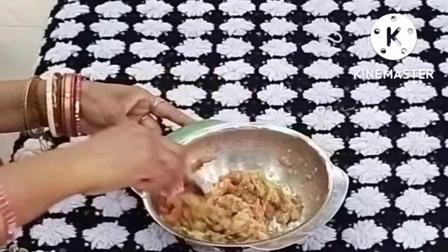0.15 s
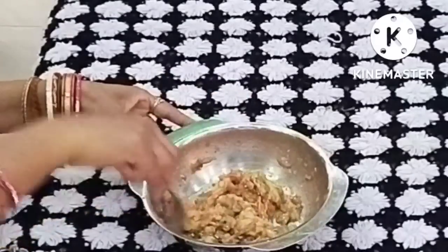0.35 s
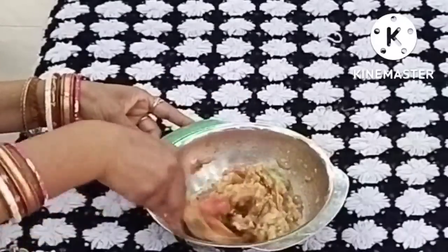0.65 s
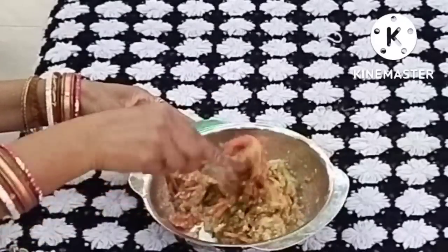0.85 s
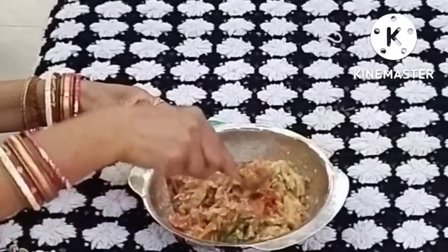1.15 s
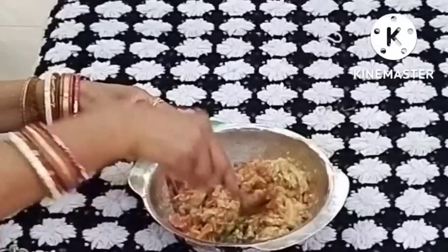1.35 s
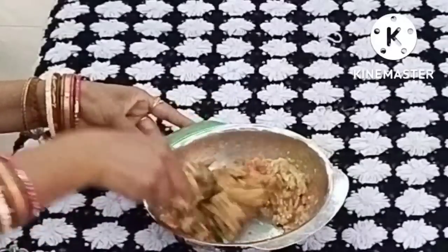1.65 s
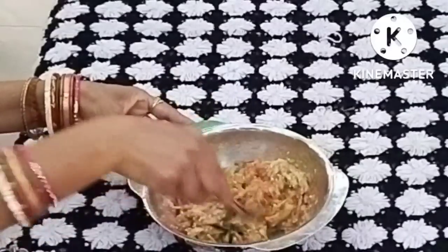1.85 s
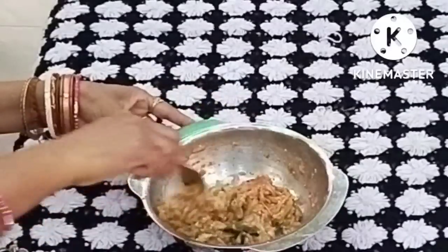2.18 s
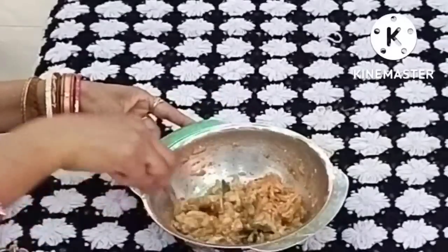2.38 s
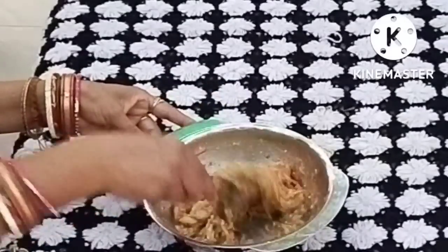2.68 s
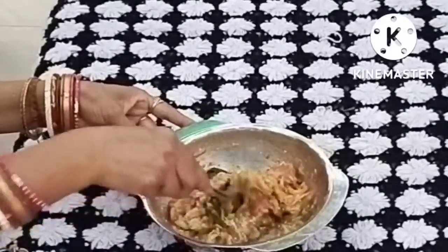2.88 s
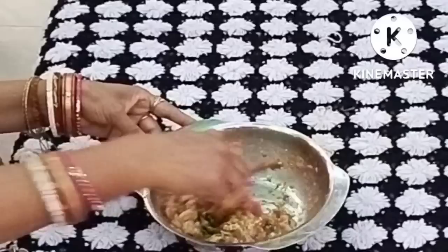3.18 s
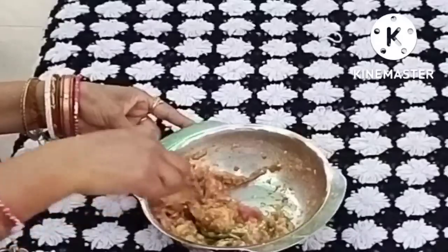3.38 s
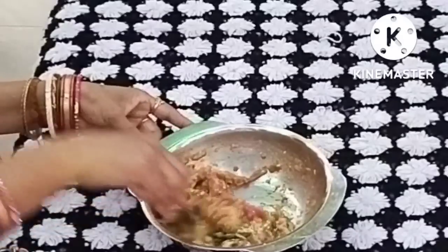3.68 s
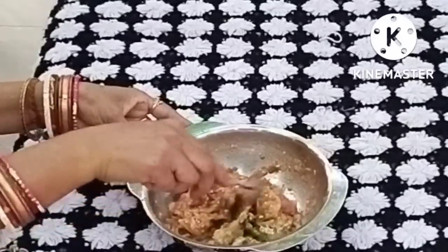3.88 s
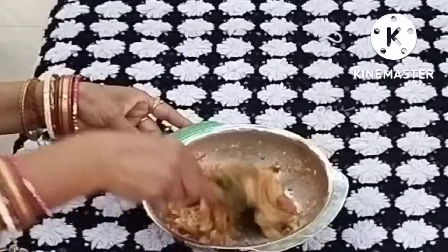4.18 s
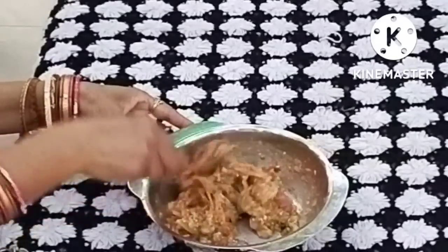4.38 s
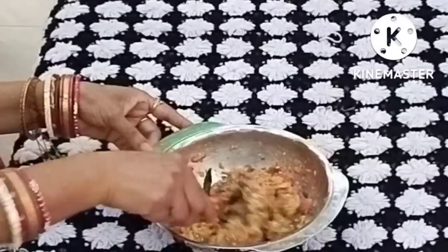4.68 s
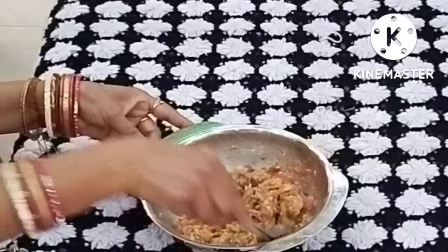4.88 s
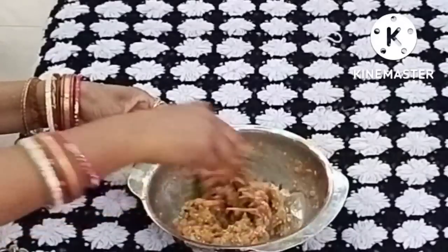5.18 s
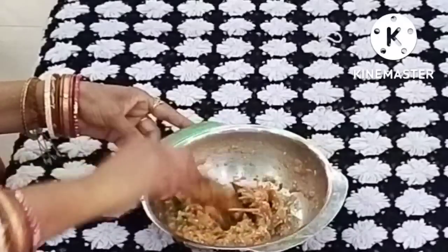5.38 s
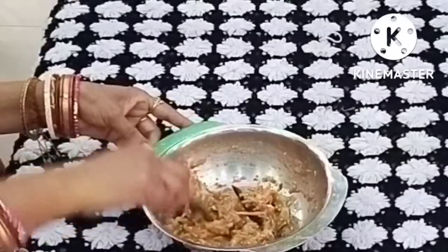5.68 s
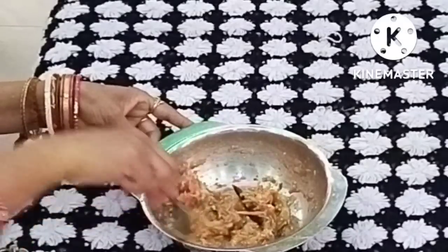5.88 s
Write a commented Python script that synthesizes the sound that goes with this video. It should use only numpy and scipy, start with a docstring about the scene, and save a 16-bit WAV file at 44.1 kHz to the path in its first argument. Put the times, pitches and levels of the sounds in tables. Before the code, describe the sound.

Steel spoon knocks lead, sharp and ringing in the early seconds, with soft crackly mash squish between. After the middle, the bowl bumps the cloth-covered table with a lower, woody-metal knock, a low rumble enters, and thin high bangle clinks grow frequent. One loud, clear bowl ring stands out late. The small hard room adds a short reverberant tail; air noise opens and shuts with each sound.

```python
"""A bare kitchen: a spoon stirs wet vegetable mash in a steel bowl, knocking on its rim and wall.
Blows and wrist bangles are decaying vibration modes under a crack of noise; mash is noise and crackle.
A short squeak falls, the bowl's foot knocks on the table, and air noise and a low rumble lie beneath.
The microphone takes in nearly as much reverberation as direct sound from blows, bangles, mash and squeak.
The recorder's noise gate opens at each small noise and sinks towards silence between."""
import sys
import numpy as np
from scipy import signal
from scipy.fft import rfft, irfft, next_fast_len
from scipy.io import wavfile
from scipy.ndimage import uniform_filter1d

SR = 44100
rng = np.random.default_rng(int(sys.argv[2]) if len(sys.argv) > 2 else 0)


def master(y):
    """Save y as 16-bit WAV."""
    cut = np.clip(np.atleast_2d(y).T, -1, 1)
    pcm = np.round(cut * 32767)  # scale
    wavfile.write(sys.argv[1], SR, pcm.astype(np.int16))


N = 266364


def from_db(db):
    """Decibels to gain."""
    return 10 ** (np.asarray(db) / 20)


def rms_one(x):
    """Scale to unit rms."""
    return x / np.sqrt(np.mean(x ** 2) + 1e-20)


def in_time(rows):
    """Columns of a curve table, read at every sample."""
    s, *columns = np.transpose(rows)
    return [np.interp(np.arange(N) / SR, s, column) for column in columns]


def at_hz(points, hz):
    """Read a spectrum on a log-frequency axis."""
    point_hz, point_db = np.array(points).T
    return np.interp(np.log(hz), np.log(point_hz), point_db)


def colour(x, spectrum):
    """Give a signal a spectrum; rms 1."""
    size = next_fast_len(N)
    hz = np.fft.rfftfreq(size, 1 / SR) + 1   # the offset avoids log of zero
    return rms_one(irfft(rfft(x, size) * from_db(at_hz(spectrum, hz)), size)[:N])


def drift(step_s):
    """Normal random values of spread 1, one every step, joined by lines."""
    count = int(N / SR / step_s) + 2
    return np.interp(np.arange(N) / SR / step_s, np.arange(count), rng.standard_normal(count))


def grains(per_s, spread_db):
    """Random clicks of uneven size and sign."""
    boost_db = spread_db * np.minimum(rng.exponential(1, N), 5)
    sizes = from_db(boost_db) * rng.standard_normal(N)
    return sizes * (rng.random(N) < per_s / SR)


def hold_and_fall(level_db, fall_db_per_s):
    """Follow rises at once, but fall no faster than the given rate."""
    fallen_db = fall_db_per_s * (np.arange(N) / SR)
    return np.maximum.accumulate(level_db + fallen_db) - fallen_db


def blows(rows, modes, crack_db, crack_s):
    """Each blow sets every mode ringing, weighted by where it lands, under a short crack of contact."""
    out = np.zeros(N + SR)
    t = np.arange(SR * 2 // 3) / SR
    hz, width, mode_db = np.transpose(modes)[:, :, None]
    chance = rng.standard_normal((len(rows), 2, len(modes), 1))
    noise = rng.standard_normal((len(rows), len(t)))
    bins = np.fft.rfftfreq(len(t), 1 / SR) + 1
    contact = t / crack_s * np.exp(1 - t / crack_s)
    for row, (uneven, turn), hiss in zip(rows, chance, noise):
        s, peak_db, top_hz, below, above, length, *favoured = row
        octaves = np.log2(hz / top_hz)
        weight_db = mode_db + np.where(octaves < 0, below, -above) * octaves
        if favoured:
            favoured_hz, extra_db = favoured
            weight_db[np.argmin(np.abs(hz - favoured_hz))] += extra_db
        # a wide mode dies fast, so it starts stronger for the same spectral height
        start = from_db(weight_db + 2 * uneven) * width
        decay = np.exp(-np.pi * width / length * t)
        rings = start * decay * np.sin(2 * np.pi * (hz * t + turn))
        ring = rings.sum(axis=0) * (1 - np.exp(-(t / crack_s) ** 2))   # the contact takes a moment
        # the crack has the outline of the modes and little beyond them
        outline = [(hz[0, 0] / 4, weight_db[0, 0] - 53.5),
                   *zip(hz[:, 0], weight_db[:, 0]),
                   (hz[-1, 0] * 4 / 3, weight_db[-1, 0] - 15)]
        crack = contact * irfft(rfft(hiss) * from_db(at_hz(outline, bins)), len(t))
        sound = ring / np.abs(ring).max() + from_db(crack_db) * crack / np.abs(crack).max()
        at = max(round(s * SR), 0)
        out[at:at + len(t)] += from_db(peak_db) * sound / np.abs(sound).max()
    return out[:N]


# spectrum of the kitchen air: f/Hz, density/dB per Hz (relative)
AIR_SPECTRUM = [(25, -46.5), (60, -46.5), (95, -24.5), (140, -5.5), (250, -3), (500, -4), (1000, -12.5),
                (2500, -20), (6000, -27.5)]
AIR_DB = -56   # middle rms level before the gate


def kitchen_air():
    """Steady noise of the room's air, its level wavering slightly."""
    return from_db(AIR_DB + 1.2 * drift(0.057)) * colour(rng.standard_normal(N), AIR_SPECTRUM)


# Blow tables list dry peaks, before room and gate. Slopes shape the modes either side of the strongest
# pitch; the ring factor multiplies decay time. Mode levels are relative, before those slopes.
# spoon on the rim: t/s, level/dB, strongest f/Hz, rise below/dB per octave, fall above/dB per octave,
# ring factor, favoured mode f/Hz, its extra level/dB
RIM_BLOWS = [(0.0, -9, 2570, 15, 7, 1, 5640, 9.5), (.684, -28, 1740, 14, -7.5, 0.83, 1770, 21),
             (.808, -30, 2860, 12, 4.5, 0.56, 3200, 4.5), (1.564, -5.5, 5050, 4, 1, 0.75, 5640, 6),
             (2.018, -3, 3900, 2, 0.5, 0.85, 6160, 0), (2.509, -12.5, 7200, 4, -2, 0.32, 7640, 8),
             (2.701, -9, 5980, -6, -11.5, 0.52, 5640, 20.5), (3.172, -18.5, 2960, 1, 4.5, 0.86, 5640, 9),
             (3.44, -1.5, 1790, -2, 7.5, 0.11, 3200, 2)]
# modes of the rim held by the hand: f/Hz, width/Hz, level/dB
RIM_MODES = [(1770, 38, -3), (2490, 29, -2), (2890, 56, -1), (3200, 25, -3), (3410, 43, -3), (3880, 23, 0),
             (4010, 43, 0), (4590, 56, -10), (5100, 28, -11), (5640, 69, -5), (6160, 64, 0),
             (7640, 230, -5), (8610, 82, -9), (9030, 52, -11), (9500, 110, -14), (10300, 45, -17),
             (10900, 32, -15), (11400, 47, -16), (11800, 37, -14), (12600, 61, -16), (12800, 25, -17),
             (13500, 96, -21), (14100, 42, -15), (14900, 88, -17)]


def rim_knocks():
    """The spoon knocks on the hand-held rim: closely spaced steel modes ring and die."""
    return blows(RIM_BLOWS, RIM_MODES, crack_db=0.0, crack_s=0.00083)


# bangles clink, dry peaks: t/s, level/dB, strongest f/Hz
BANGLE_BLOWS = [(0, -25, 10300), (.243, -44, 12100), (.622, -42.5, 8200), (0.6516, -40, 11000),
                (.718, -45, 13500), (1.11, -40.5, 11100), (1.2832, -37, 11800), (1.401, -38.5, 8400),
                (1.501, -46, 11400), (1.882, -42, 8500), (1.9792, -31, 11300), (2.255, -44, 10240),
                (2.63, -43.5, 11200), (2.987, -45.5, 11300), (3.119, -45, 11900), (3.5418, -24.5, 10600),
                (3.746, -24.5, 9700), (4.1557, -34.5, 10500), (4.223, -25.5, 9500), (4.275, -36.5, 9300),
                (4.538, -43, 9420), (4.6333, -39.5, 9400), (4.7573, -44.5, 9900), (4.783, -40, 10800),
                (4.8438, -22.5, 9500), (4.904, -29.5, 9400), (5.035, -20.5, 9500), (5.112, -15, 9400),
                (5.752, -39.5, 9180), (5.7679, -32.5, 10100), (5.9, -34, 11000), (6.011, -23, 9600)]
# modes of the bangles: f/Hz, width/Hz, level/dB
BANGLE_MODES = [(5550, 250, -2), (8860, 120, -16.5), (10070, 170, -3.5), (9265, 340, 3.5), (10860, 54, -2),
                (10200, 37, -4.5), (10450, 53, -8), (11410, 74, -6.5), (12570, 200, -3.5),
                (14500, 74, -12.5)]
CLINK_BELOW_DB, CLINK_ABOVE_DB = 15.5, 18   # rise and fall per octave round the strongest pitch


def bangle_clinks():
    """Bangles on the wrist strike each other: high modes ring under a contact crack."""
    rows = [(*row, CLINK_BELOW_DB, CLINK_ABOVE_DB, 1) for row in BANGLE_BLOWS]
    return blows(rows, BANGLE_MODES, crack_db=-3, crack_s=0.00075)


SOFT_SOUNDS_DB = -7   # gain of both jingle and mash against the blows
RATTLE_DB, RATTLE_FADE_DB_PER_S = -16, 109   # start against the clink's peak, then fade
RATTLE_FLOOR_DB = -71.5   # before the soft-sounds gain


def rattling():
    """Level of the jingle in dB: each clink can lift it, then it fades to a floor."""
    t = np.arange(N) / SR
    level_db = np.full(N, float(RATTLE_FLOOR_DB))
    for s, peak_db, _ in BANGLE_BLOWS:
        fading_db = peak_db + RATTLE_DB - RATTLE_FADE_DB_PER_S * (t - s)
        level_db = np.where(t >= s, np.maximum(level_db, fading_db), level_db)
    return level_db


# which bangles touch: t/s, strongest f/Hz
JINGLE_PITCH = [(0, 11610), (3.3, 11760), (3.5, 9700), (5.8, 9610), (5.9, 10380), (6.04, 9550)]


def jingle():
    """Bangles rub and rattle: dense small contacts excite their modes, damped more than in a clink."""
    contacts = grains(1300, spread_db=5.0) * from_db(2.6 * drift(0.027))
    strongest_hz, = in_time(JINGLE_PITCH)
    out = 0
    for hz, width, mode_db in BANGLE_MODES:
        r = np.exp(-np.pi * width * 2.5 / SR)   # 2.5 times the clink's mode width
        resonator = [1, -2 * r * np.cos(2 * np.pi * hz / SR), r * r]
        ringing = signal.lfilter([1 - r, 0, r - 1], resonator, contacts)
        distance_octaves = np.abs(np.log2(hz / strongest_hz))
        out = out + from_db(mode_db - 41 * distance_octaves) * ringing
    return from_db(rattling() + SOFT_SOUNDS_DB) * rms_one(out)


# steady rubbing of the mash, before the soft-sounds gain: t/s, level/dB
STIR = [(0, -61), (.3, -57.5), (.6, -64), (.88, -72), (1.05, -99), (1.2, -72), (1.45, -57), (1.8, -72.5),
        (2.3, -60), (2.6, -80), (2.88, -76), (3.1, -66), (3.4, -64), (4.05, -61.5), (4.5, -58),
        (4.75, -61.5), (5.45, -57), (5.65, -92), (6.04, -58)]
# squelches under the spoon, before the soft-sounds gain: t/s, starting level/dB, length/s
SQUELCHES = [(0.134, -53.5, 0.033), (0.236, -49, 0.026), (0.558, -60, .04), (0.62, -45, 0.011),
             (0.651, -48.5, 0.062), (0.777, -41, 0.02), (1.106, -55, 0.076), (1.182, -48.5, 0.017),
             (1.227, -72, 0.0044), (1.25, -46.5, .004), (1.288, -49, .025), (1.328, -45.5, 0.028),
             (1.408, -56.5, 0.045), (1.464, -73, 0.0085), (1.476, -47.5, 0.0057), (1.499, -55, .022),
             (1.535, -56.5, .012), (1.744, -55.5, 0.082), (1.88, -42.5, 0.026), (1.975, -48.5, 0.062),
             (2.205, -58, 0.034), (2.254, -56.5, 0.0049), (2.356, -46.5, .008), (2.428, -58.5, 0.05),
             (2.634, -50.5, 0.012), (2.666, -44, 0.022), (2.988, -45, 0.0059), (3.028, -54, 0.0068),
             (3.046, -48.5, 0.0053), (3.064, -48, 0.0065), (3.12, -53, 0.012), (3.16, -47, .004),
             (3.372, -51, 0.0074), (3.531, -53, 0.036), (3.687, -42.5, 0.2), (3.921, -55.5, 0.035),
             (4.145, -65.5, 0.018), (4.272, -39.5, 0.067), (4.41, -63, 0.13), (4.515, -65.5, 0.045),
             (4.572, -56, 0.0066), (4.611, -64, 0.024), (4.765, -58, 0.018), (4.783, -59, 0.006),
             (4.836, -42.5, 0.086), (4.942, -79, 0.008), (5.027, -51, 0.082), (5.247, -40.5, 0.072),
             (5.434, -61.5, 0.024), (5.749, -54, .008), (5.761, -50.5, 0.016), (5.877, -50, 0.048),
             (6.007, -47, 0.024)]
SQUELCH_SAG_DB_PER_S = 27   # a long squelch weakens as it goes


def stirring():
    """Level of the mash in dB: steady rubbing plus squelches that start at once, sag and stop."""
    gain = from_db(in_time(STIR)[0])
    for s, level_db, length in SQUELCHES:
        t = np.arange(round(length * SR)) / SR
        part = gain[round(s * SR):][:len(t)]
        part += from_db(level_db - SQUELCH_SAG_DB_PER_S * t[:len(part)])   # adds into gain
    return 20 * np.log10(gain)


# spectrum of the wet mash: f/Hz, density/dB per Hz (relative)
MASH_SPECTRUM = [(300, -19.5), (900, 6), (2000, 4.5), (3500, 3), (5500, -3.5), (8500, -8.5), (11500, -10),
                 (15000, -12.5), (17000, -18.5)]


def mash():
    """Wet squish: clumped crackles over a soft rubbing hiss."""
    crackle = rms_one(grains(900, spread_db=3.5) * from_db(3 * drift(0.02)))
    hiss = .6 * rng.standard_normal(N)
    return from_db(stirring() + SOFT_SOUNDS_DB) * colour(crackle + hiss, MASH_SPECTRUM)


# spoon on mash-damped steel, dry peaks: t/s, level/dB, strongest f/Hz, rise below/dB per octave,
# fall above/dB per octave, ring factor
CLACK_BLOWS = [(.3515, -0.5, 3600, 6, 4.5, 0.27), (.47, -14.5, 2860, -14, -18, 0.14),
               (1.188, -37, 4000, 15.5, -13, 0.49), (1.33, -27, 2065, -3, 15.5, 0.34),
               (2.943, -24, 1670, -1, 35, 0.35), (3.792, -28.5, 3070, 21, 49, 0.36),
               (4.852, -24.5, 2755, -1, 2, 0.2)]
# modes of the steel damped by mash: f/Hz, width/Hz, level/dB
CLACK_MODES = [(1400, 150, -14), (1700, 100, -11), (2305, 40, -3), (2615, 40, -5), (2740, 60, -2),
               (3200, 40, -11), (3660, 25, -4), (3830, 80, -1), (4100, 30, -2), (4180, 40, -1),
               (4320, 60, -5), (4720, 80, -12), (5140, 50, -13), (5340, 50, -16), (6660, 50, -13),
               (8130, 60, -21), (9030, 100, -28), (10600, 50, -31), (14800, 130, -30)]


def damped_clacks():
    """The spoon hits steel damped by mash: short-lived modes give a clack."""
    return blows(CLACK_BLOWS, CLACK_MODES, crack_db=-0.5, crack_s=0.00047)


# a falling squeak, middle dry level: t/s, f/Hz, level/dB
SQUEAK = [(2.415, 6600, -58), (2.43, 5640, -54), (2.455, 3870, -57), (2.48, 3700, -59), (2.495, 3320, -83)]


def squeak():
    """One short falling tone with a rapidly uneven level."""
    hz, level_db = in_time(SQUEAK)
    t = np.arange(N) / SR
    sounding = (t > SQUEAK[0][0]) & (t < SQUEAK[-1][0])
    tone = np.sin(2 * np.pi * np.cumsum(hz) / SR)
    return sounding * from_db(level_db + 5.3 * drift(0.0028)) * tone


# a low rumble sets in, rms before the gate: t/s, level/dB
RUMBLE_LEVEL = [(0, -81.5), (3.45, -84.5), (3.6, -58), (4.0, -60.5), (4.6, -58), (5.2, -55), (6.04, -60.5)]
# spectrum of the rumble: f/Hz, density/dB per Hz (relative)
RUMBLE_SPECTRUM = [(25, -28), (50, -17.5), (75, -3), (110, -3), (180, 3.5), (260, -14.5), (500, -38)]


def low_rumble():
    """Low-frequency noise follows a level curve."""
    return from_db(in_time(RUMBLE_LEVEL)[0]) * colour(rng.standard_normal(N), RUMBLE_SPECTRUM)


# bowl's foot on the table, dry peaks: t/s, level/dB, strongest f/Hz, rise below/dB per octave,
# fall above/dB per octave, ring factor
FOOT_BLOWS = [(3.532, -30.5, 990, -3, 15, 1), (3.577, -4, 1346, 4.5, -0.5, 1.23),
              (5.8165, -15.5, 850, -14, 7.5, 0.27)]
# modes of the bowl's foot on the cloth-covered table: f/Hz, width/Hz, level/dB
FOOT_MODES = [(620, 120, -12), (765, 40, -4), (825, 20, 0), (880, 20, 1), (953, 25, -3), (1250, 60, -5),
              (1410, 40, 0), (1535, 40, -4), (1780, 60, -13), (2360, 60, -13), (2780, 70, -13),
              (3040, 60, -15), (3470, 60, -18), (3730, 60, -17), (4210, 70, -24), (5600, 300, -36),
              (7250, 200, -27), (8190, 120, -26), (8880, 120, -28), (9630, 120, -30)]


def bowl_foot_knocks():
    """The bowl's foot knocks on the cloth-covered table: mostly low modes after a slower contact."""
    return blows(FOOT_BLOWS, FOOT_MODES, crack_db=0.0, crack_s=0.0016)


# spoon on the bare wall, dry peaks: t/s, level/dB, strongest f/Hz, rise below/dB per octave,
# fall above/dB per octave, ring factor, favoured mode f/Hz, its extra level/dB
WALL_BLOWS = [(4.218, -18.5, 2400, 1, 1, 0.9, 1940, 9), (5.1105, -1, 2500, 0.5, 0.22, 0.89, 3066, -6)]
# modes of the bare bowl wall: f/Hz, width/Hz, level/dB
WALL_MODES = [(883, 14, -9), (1248, 12, -6), (1450, 30, -3), (1540, 40, -5), (1600, 25, -4), (1706, 30, -8),
              (1940, 7, 0), (2096, 20, -9), (2290, 25, -13), (2820, 12, -4), (3050, 20, -4), (3082, 5, 8),
              (3735, 20, -7), (3770, 7, -2), (3825, 20, -8), (4300, 40, -19), (4680, 120, -20),
              (5450, 20, -12), (6260, 25, -17), (7000, 25, -18), (7680, 32, -20), (7870, 35, -19),
              (8550, 25, -18), (8710, 60, -14), (9240, 80, -16), (10100, 60, -18), (10800, 51, -21),
              (11800, 140, -33), (13900, 47, -40)]


def wall_strikes():
    """The spoon strikes the bare bowl wall: narrow, lightly damped modes ring on."""
    return blows(WALL_BLOWS, WALL_MODES, crack_db=3.0, crack_s=0.00037)


# reverberation time of the bare kitchen: f/Hz, time to fall 60 dB/s
ROOM_T60 = [(200, 0.31), (1000, 0.43), (3000, 0.25), (7000, 0.22), (14000, 0.22)]
ROOM_DB = -0.5   # gain of the unit-energy tail against the direct sound


def kitchen(x):
    """Dense reflections: noise in half-octave bands, each dying at its own rate, after a short gap."""
    t = np.arange(SR // 2) / SR
    edges = 100 * 2 ** np.arange(0, 8, .5)
    white = rng.standard_normal((2, len(t)))
    tail = 0
    for k, (low, high) in enumerate(zip(edges, edges[1:])):
        band_filter = signal.butter(2, [low, high], "band", fs=SR, output="sos")
        band = signal.sosfilt(band_filter, white[k % 2])   # neighbouring bands use different noise
        tail = tail + band * from_db(-60 * t / at_hz(ROOM_T60, np.sqrt(low * high)))
    tail = tail * np.clip((t - .002) / 0.0014, 0, 1)
    reflections = signal.fftconvolve(x, tail / np.sqrt(np.sum(tail ** 2)))[:N]
    return x + from_db(ROOM_DB) * reflections


# band the recorder's noise gate listens to: lower f/Hz, upper f/Hz
GATE_BAND = 1600, 7200
# gate response before sink limit and flutter: heard level/dB, gain/dB
GATE_CURVE = [(-80, -60), (-65.5, -34.5), (-61.5, -19), (-56.5, 0)]
# brief level dip between two blows: t/s, length/s, gain/dB
DIP = (3.518, .016, -11.5)
GATE_RELEASE_DB_PER_S, GATE_FLUTTER_DB = 301, 2.5   # fall of the heard level; spread of the flutter
GATE_KNEE_DB, GATE_SINK_DB_PER_S = -17, 170   # below the knee the gain sinks no faster than this


def gate(x):
    """A quiet mid band turns the whole sound down; it opens promptly, lets go slowly and flutters."""
    t = np.arange(N) / SR
    heard = signal.sosfilt(signal.butter(2, GATE_BAND, "band", fs=SR, output="sos"), x)
    power = np.abs(uniform_filter1d(heard ** 2, size=200))
    held_db = hold_and_fall(10 * np.log10(power + 1e-14), GATE_RELEASE_DB_PER_S)
    gain_db = np.interp(held_db, *np.sort(np.transpose(GATE_CURVE)))
    sinking_db = hold_and_fall(np.minimum(gain_db, GATE_KNEE_DB), GATE_SINK_DB_PER_S)
    gain_db = np.maximum(gain_db, sinking_db) + GATE_FLUTTER_DB * drift(.012)
    dip_s, dip_length_s, dip_db = DIP
    gain_db += dip_db * ((t > dip_s) & (t < dip_s + dip_length_s))
    return x * uniform_filter1d(from_db(gain_db), size=40)


def scene():
    """Blows, bangles, mash and squeak in the room, over kitchen air and rumble."""
    direct = rim_knocks() + damped_clacks() + bowl_foot_knocks() + wall_strikes()
    direct += bangle_clinks()
    direct += jingle() + mash() + squeak()
    background = kitchen_air() + low_rumble()
    return (kitchen(direct) + background)[None]


CUTOFF_HZ = 15600


def record(dry):
    """The recorder's noise gate, then rounded peaks and a steep treble cut."""
    gated = gate(dry[0])[None]
    rounded = 1.5 * np.tanh(gated / 1.5)
    treble_cut = signal.ellip(8, .5, 45, CUTOFF_HZ, fs=SR, output="sos")
    return signal.sosfilt(treble_cut, rounded)


dry = scene()
out = record(dry)
master(out)
```